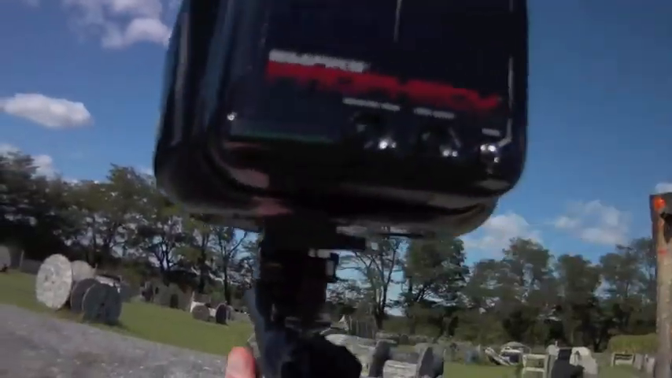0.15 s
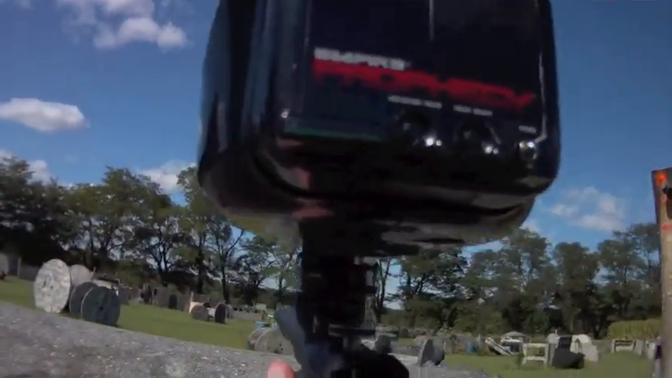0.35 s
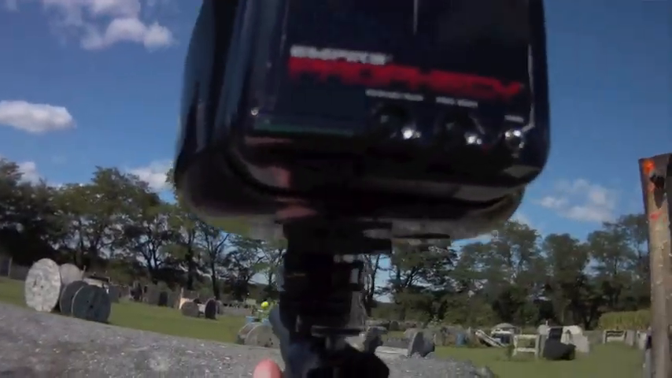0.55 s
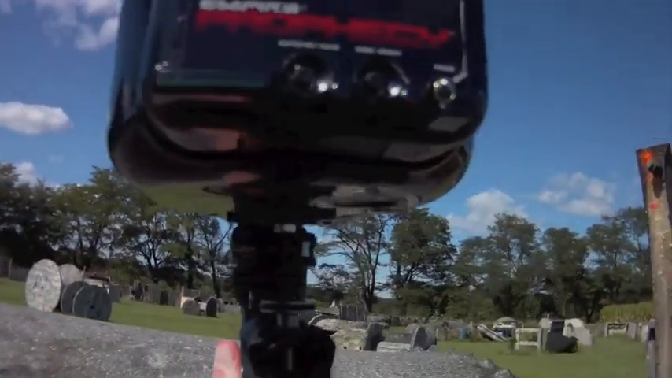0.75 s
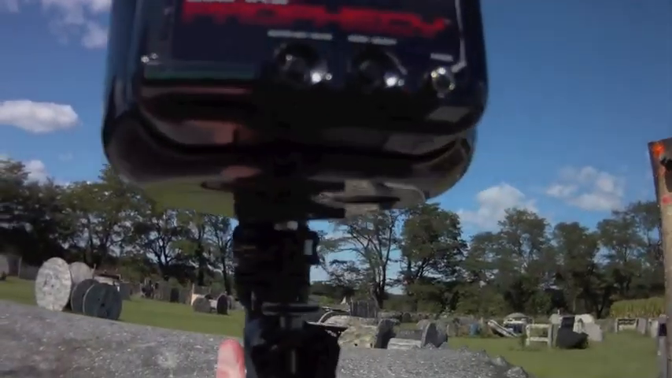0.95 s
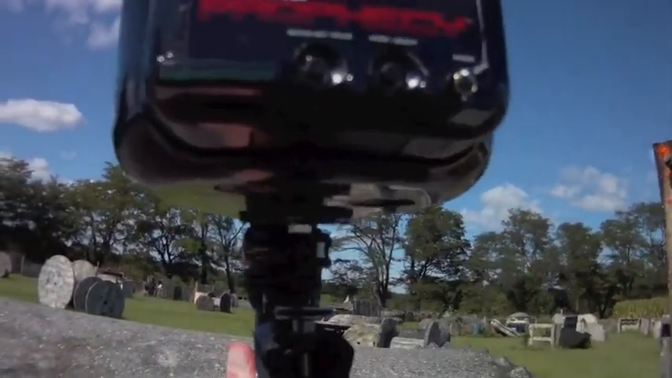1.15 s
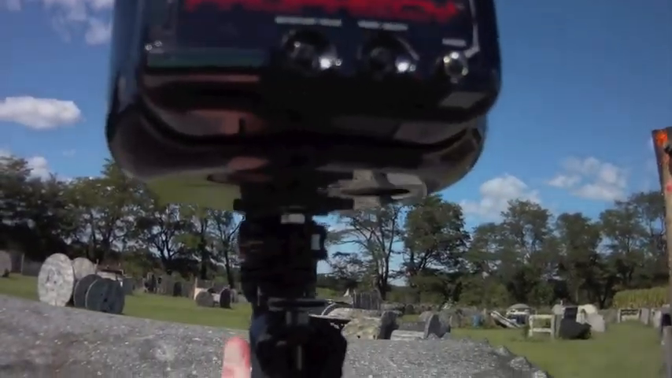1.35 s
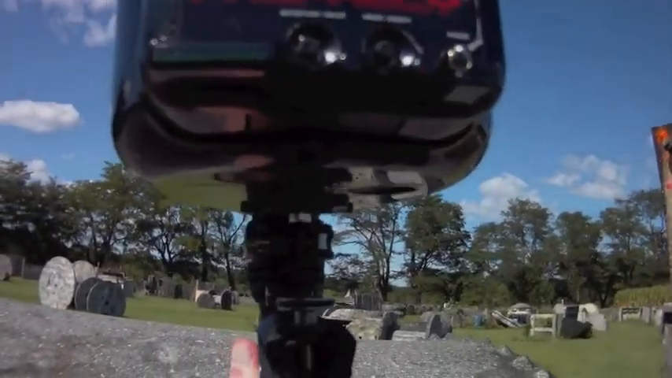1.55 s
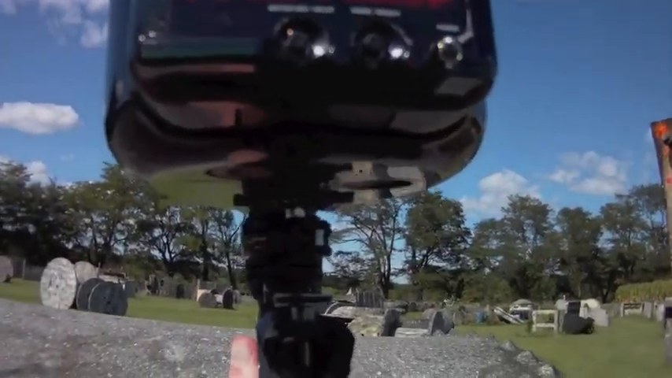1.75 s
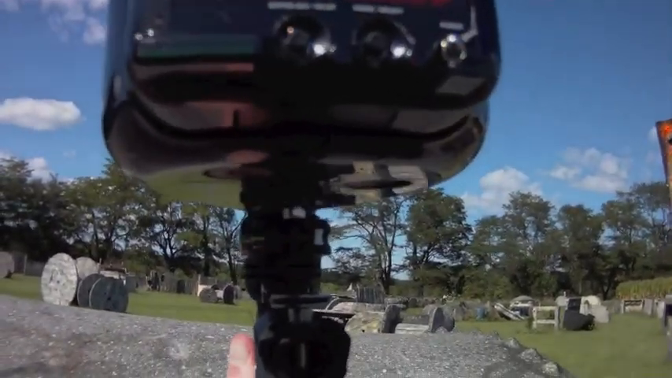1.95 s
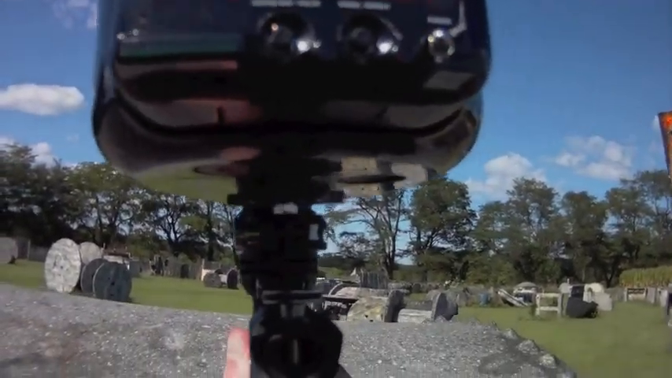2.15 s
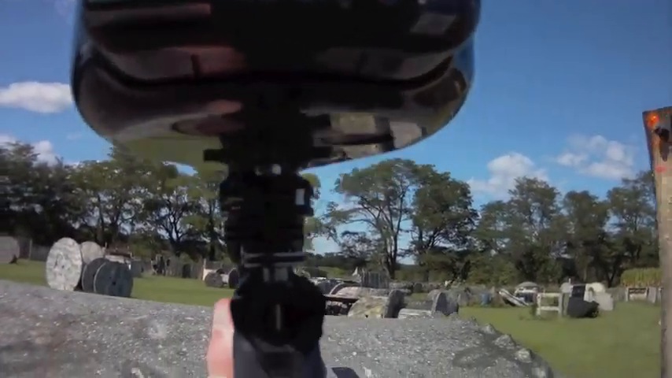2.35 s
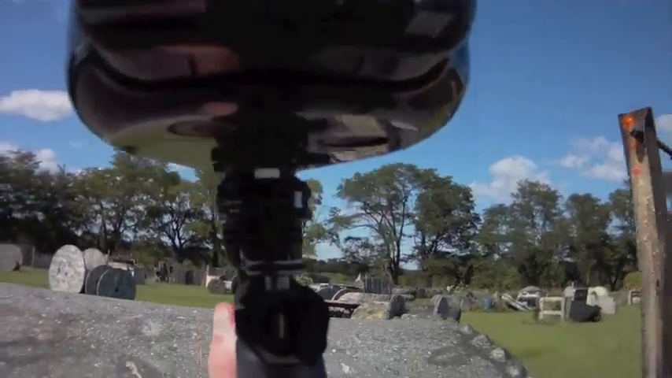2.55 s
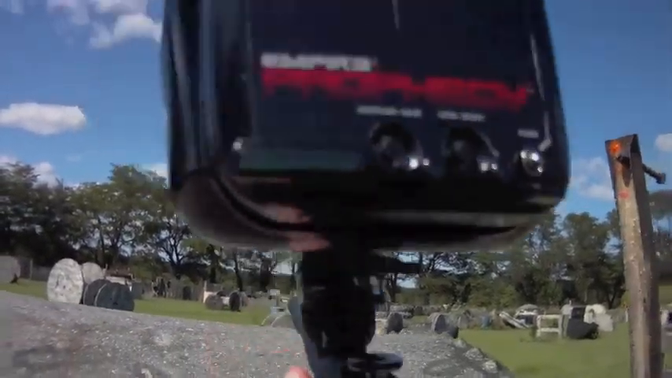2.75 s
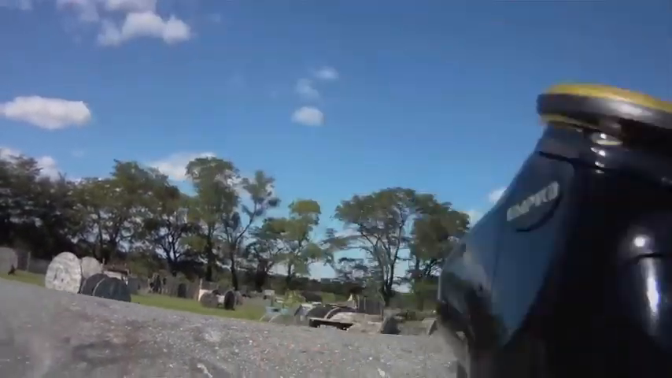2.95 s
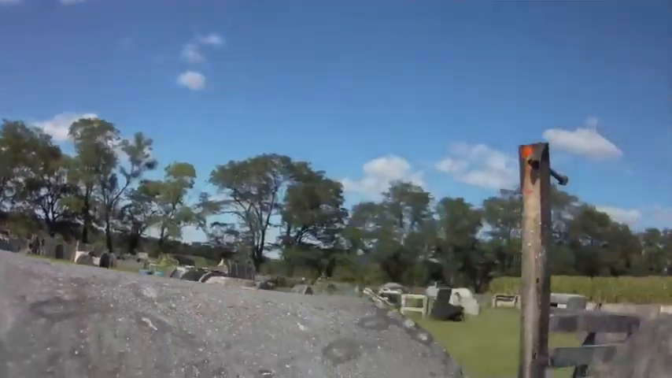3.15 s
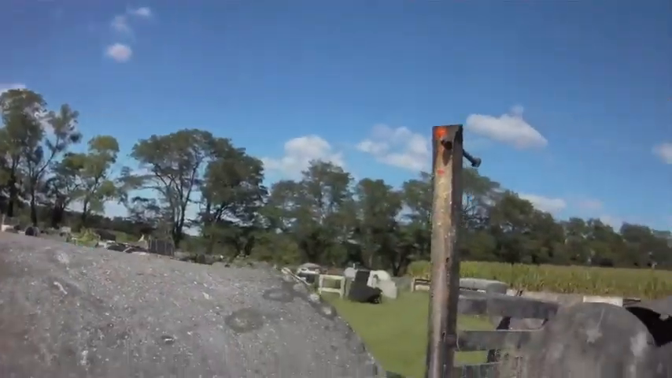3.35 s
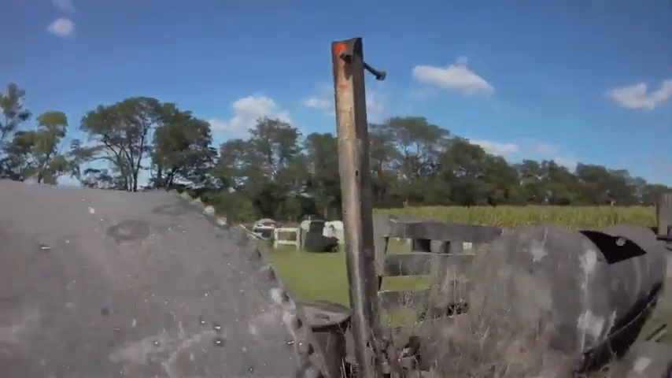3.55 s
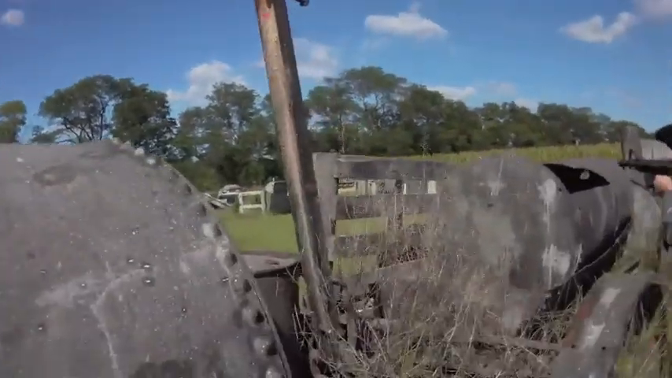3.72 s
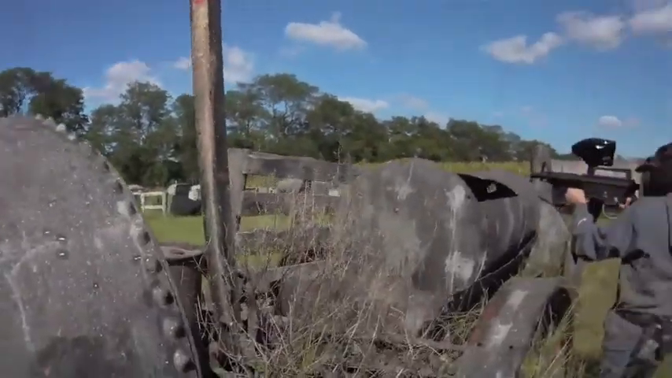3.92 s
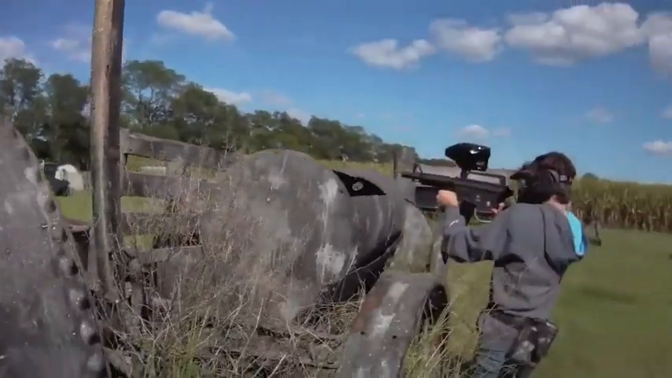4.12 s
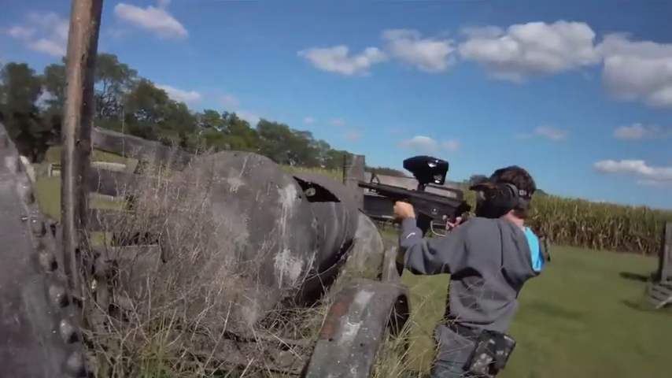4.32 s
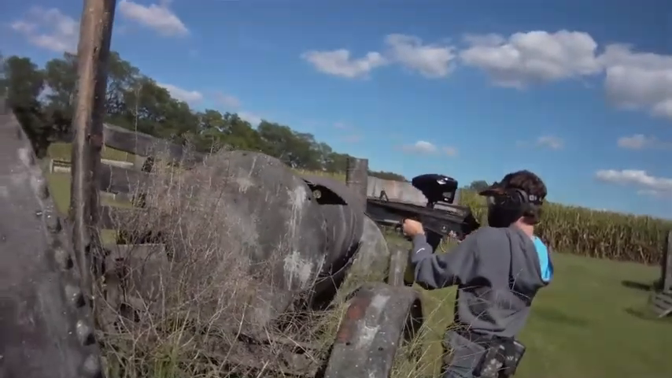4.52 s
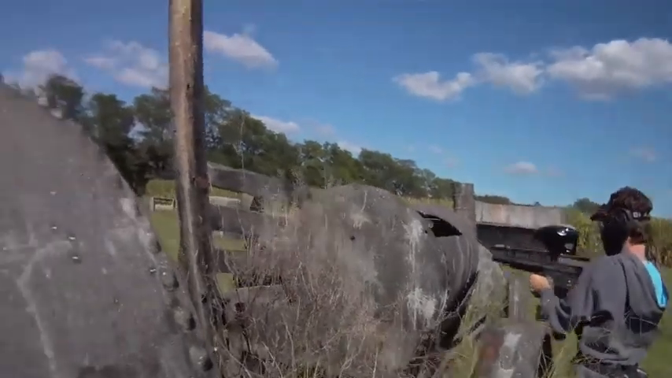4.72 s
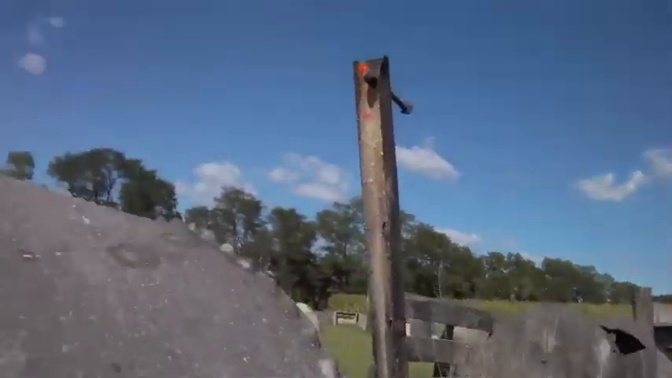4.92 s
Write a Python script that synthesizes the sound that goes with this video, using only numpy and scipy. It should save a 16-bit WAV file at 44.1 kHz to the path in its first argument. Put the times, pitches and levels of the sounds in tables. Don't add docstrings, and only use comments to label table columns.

```python
import sys
import numpy as np
from scipy import signal
from scipy.fft import rfft, irfft
from scipy.io import wavfile
from scipy.ndimage import uniform_filter1d, map_coordinates

SR = 44100
rng = np.random.default_rng(int(sys.argv[2]) if len(sys.argv) > 2 else 0)


def linear_from_db(decibels):
    return 10 ** (np.asarray(decibels, float) / 20)


def persist_wave(psi):
    counts = np.round(np.clip(psi, -1, 1) * 32767).astype(np.int16)
    wavfile.write(sys.argv[1], SR, np.atleast_2d(counts).T)


N = 223807


def unit(x):
    return x / np.sqrt(np.mean(x ** 2) + 1e-20)


def along(points, hz):
    f, v = np.transpose(points)
    return np.interp(np.log(hz + 1), np.log(f + 1), v)


def peaks(rows, hz):
    return sum(gain / (1 + (2 * (hz - centre) / width) ** 2) for centre, width, gain in rows)


def curves(rows):
    s, *cols = np.transpose(rows)
    return [np.interp(np.arange(N) / SR, s, c) for c in cols]


def wobble(rate):
    knots = rng.standard_normal(int(N * rate / SR) + 4)
    return map_coordinates(knots, [np.arange(N) * rate / SR])


# hz, level_db (per Hz)
CASE_TRANSMISSION = [(18, -55), (30, -33.5), (138, -1), (221, -12.5), (394, 3), (666, 2), (1010, -13.5),
                     (1540, -11), (2230, -11), (2980, -10.5), (3870, -2.5), (5040, -22), (8300, -15),
                     (14400, -28.5), (16000, -39)]
# centre_hz, width_hz, gain_db
CASE_CAVITY = [(421.6, 50, 4), (586, 140, 3), (2227, 1000, 6.5), (2600, 650, 4.5), (3520, 150, 0),
               (4030, 50, 0.5), (4450, 1100, 5)]


def response(colour, size=4096):
    hz = np.fft.rfftfreq(size, 1 / SR)
    db = along(CASE_TRANSMISSION, hz) + along(colour, hz) + peaks(CASE_CAVITY, hz)
    cepstrum = irfft(np.log(np.maximum(linear_from_db(db), 1e-7)))
    cepstrum[1:size // 2] *= 2
    cepstrum[size // 2 + 1:] = 0
    h = irfft(np.exp(rfft(cepstrum)))[:size // 2]
    return h / np.linalg.norm(h)


def heard(x, colour):
    return signal.fftconvolve(x, response(colour))[:N]


def place(times, waves):
    first = np.round(np.asarray(times) * SR).astype(int)
    at = first[:, None] + np.arange(waves.shape[1])
    return np.bincount(at.ravel(), waves.ravel(), N + SR)[:N]


def burst_shape(t, rise, hold, t60):
    return (1 - np.exp(-t / rise)) * linear_from_db(-60 * np.maximum(t - hold, 0) / t60)


def puffs(times, dbs, rise, hold, t60, same=0.):
    t = np.arange(SR // 8) / SR
    share = np.clip(same, 0, 1)
    noise = rng.standard_normal((len(times) + 1, len(t)))
    noise = np.sqrt(share) * noise[0] + np.sqrt(1 - share) * noise[1:]
    return place(times, linear_from_db(dbs)[:, None] * burst_shape(t, rise, hold, t60) * noise)


def rings(times, dbs, hz, rise, hold, t60):
    t = np.arange(SR // 8) / SR
    sines = np.sin(2 * np.pi * np.reshape(hz, (-1, 1)) * t)
    return place(times, linear_from_db(dbs)[:, None] * burst_shape(t, rise, hold, t60) * sines)


def pushes(times, dbs, colour):
    h = response(colour)
    spikes = np.bincount(np.round(np.asarray(times) * SR).astype(int), linear_from_db(dbs), N)
    return signal.fftconvolve(spikes, h / np.abs(h).max())[:N]


def echoes(x, decays, delay, lumpy_db):
    out, step = np.zeros(N + 2 * SR), SR // 5
    for start in range(0, N, step):
        hz, t, z = signal.stft(rng.standard_normal(SR * 3 // 4), SR, nperseg=256)
        lumps = lumpy_db * unit(uniform_filter1d(rng.standard_normal(len(t)), size=2))
        gain = linear_from_db(lumps - 60 * t / along(decays, hz)[:, None])
        tail = signal.istft(z * gain, SR, nperseg=256)[1]
        wet = signal.fftconvolve(x[start:start + step], tail / np.linalg.norm(tail))
        out[start + round(delay * SR):][:len(wet)] += wet
    return out[:N]


def lumpy(colour, depth_db, rate):
    return unit(linear_from_db(depth_db * wobble(rate)) * heard(rng.standard_normal(N), colour))


# start_s, blast_db, whistle_hz, low_whistle_db
SHOTS = [(0.165, -3.5, 3630, -9.5), (0.3617, -4, 3520, -8.5), (0.5503, -4.5, 3520, -7.5),
         (0.7278, -4.5, 4060, -12.5), (0.9087, -3.5, 3910, -18.5), (1.0883, -4.5, 4020, -12.5),
         (1.268, -5.5, 3520, -2.5), (1.442, -4.5, 3420, -11), (1.6229, -4, 3600, -12.5),
         (1.8176, -5.5, 3540, -7.5), (2.0046, -3, 3536, -5.5), (2.198, -4.5, 3490, -11.5),
         (2.3913, -3.5, 4010, -5)]
# hz, level_db
BLAST_COLOUR = [(100, -32.5), (700, -25), (1050, -18.5), (1350, -3), (1650, -0.5), (5000, 0), (15000, 1.5)]
# delay_s, pitch_hz, level_db, rise_s, t60_s
CASE_MODES = [
    (0.00017, 520, 5.5, 0.0014, 0.023),
    (0.0006, 740, -9.5, 0.0017, 0.022),
    (0.00709, 395.7, 2.5, 0.0032, 0.026),
    (0.00055, 147, -4.5, 0.0021, 0.043),
]


def marker():
    s, db, high_hz, low_db = np.transpose(SHOTS)
    s = s + .0005
    blow = puffs(s, db - 2, .00015, .0012, .025)
    roar = puffs(s, db - 8.5, 0.0009, 0.0021, .018, same=0.64)
    blast = heard(blow + roar, BLAST_COLOUR)
    grip = rng.standard_normal((len(s), 3))
    low_hz = 2264 * (1 + 0.023 * grip[:, 2])
    whistle = rings(s, db - 7, high_hz, 0.000086, 0.002855, 0.016)
    whistle += rings(s, db + low_db, low_hz, 0.0001, 0.0051, 0.0039)
    body, body_db = 0, -10
    for lag, hz, gain_db, rise, t60 in CASE_MODES:
        mode_db = body_db + gain_db + 2.3 * grip[:, 0]
        body += rings(s + lag, mode_db, hz * (1 + 0.017 * grip[:, 1]), rise, 0, t60)
    return blast + whistle + body


BOLT_RETURNS = [.192, .3918, .5811, .7576, .9394, 1.1188, 1.2994, 1.4726, 1.6537, 1.8473, 2.0346, 2.2277,
                2.4218]
# hz, level_db
SLIDE_COLOUR = [(100, -32), (700, -9), (2500, -1), (4500, -2.5), (8000, -6.5), (15000, -15)]
THUMP_COLOUR = [(60, -15.5), (150, -0.5), (500, -4.5), (900, -18), (1600, -29.5), (4000, -61)]
METAL_COLOUR = [(100, -21), (600, -9.5), (2500, 3), (4000, -1), (10000, 4.5), (15000, 10)]


def action():
    shot = np.transpose(SHOTS)[0]
    play = rng.standard_normal((len(shot), 2))
    valve_lead_s, valve_db, return_db = .0194, -33.5, -11
    s, db = shot - valve_lead_s, valve_db + 1.2 * play[:, 0]
    valve = heard(puffs(s, db + 1.5, .0003, .0028, .012, same=.3), BLAST_COLOUR)
    forward = heard(puffs(s + 0.0066, db - 2.5, .0012, 0.009, 0.01), SLIDE_COLOUR)
    forward += pushes(s + 0.0055, db + 3.0, THUMP_COLOUR)
    seat = heard(puffs(s + .0088, db - 1.0, .0008, .0025, .014), METAL_COLOUR)

    s, db = np.array(BOLT_RETURNS), return_db + .6 * play[:, 1]
    tick = heard(puffs(s - .0062, db - 25.5, .0003, .0008, .01), SLIDE_COLOUR)
    slam = pushes(s + 0.001, db + 4.5, METAL_COLOUR)
    slam += heard(puffs(s, db - 10.5, 0.00062, 0.0004, .025), METAL_COLOUR)
    slam += rings(s + .0007, db, 2680, 0.00031, 0.00055, 0.0058)
    slam += rings(s + 0.00073, db - 14.0, 480, 0.0034, 0.0045, 0.03)
    bounce = heard(puffs(s + .0066, db - 23.5, .0006, 0.0018, 0.019), METAL_COLOUR)
    return valve + forward + seat + tick + slam + bounce


# start_s, direct_crack_db, scattered_blast_db, thump_db
NEIGHBOUR_SHOTS = [(1.035, -28, -20.5, -13.5), (1.2314, -24, -17, -12.5), (1.4314, -12, -17.5, -14),
                   (1.625, -28, -16, -14.5), (1.816, -15, -14.5, -17.5), (2.005, -26, -22, -14),
                   (2.2113, 2, -17.5, -14), (2.3816, -8.5, -19.5, -13), (2.568, -21, -20, -17),
                   (2.7881, -37, -20, -16), (3.001, -34, -20.5, -17.5), (3.206, -24, -19.5, -17.5),
                   (3.427, -13, -14.5, -17.5), (3.6148, -9, -18.5, -18.5), (3.814, 2, -16, -17.5),
                   (4.0068, 5, -20.5, -18), (4.213, 4, -17, -19.5)]
# hz, level_db
CRACK_COLOUR = [(100, -26), (700, -3.5), (1100, -1.5), (2000, 1.5), (4300, 3.5), (5500, 9), (6800, 6.5),
                (8300, -0.5), (11000, 6.5), (15000, 2)]
# hz, t60_s
YARD_DECAY = [(150, 0.5), (500, 0.14), (3000, 0.12), (10000, 0.13)]
# delay_s, low_db, bright_db
BUNKERS = [
    (.098, -37.5, -40),
    (0.141, -45.5, -47),
]


def neighbour():
    s, crack_db, scatter_db, thump_db = np.transpose(NEIGHBOUR_SHOTS)
    play = rng.standard_normal((len(s), 2))
    thump_hz = np.interp(s, (3.35, 3.81), (629, 483)) * (1 + .025 * play[:, 0])
    bolt_db = -25 + 1.2 * play[:, 1]
    hiss = puffs(s - .0228, bolt_db - 27, .001, 0.021, .025)
    valve = puffs(s - .0228, bolt_db - 18, .0004, 0.0013, 0.013)
    lead = puffs(s - .0022, scatter_db - 6, .001, .002, .01)
    scatter = puffs(s, scatter_db + 3.5, 0.001, 0.0019, 0.012)
    scatter += puffs(s + 0.0033, scatter_db, 0.00079, 0.00092, 0.016)
    bolt = puffs(s + .014, bolt_db + 2, .0008, .002, .022)
    bright = heard(hiss + valve + lead + scatter + bolt, CRACK_COLOUR) - pushes(s, crack_db, CRACK_COLOUR)
    thump = rings(s, thump_db, thump_hz, .0007, .0052, .02)
    thump += rings(s, thump_db - 22, 105, 0.0043, 0.0064, 0.066)
    thump += rings(s + 0.00064, thump_db - 5.5, 362, 0.0011, 0.0029, 0.043)
    yard = echoes(linear_from_db(-12.5) * bright + linear_from_db(-11.5) * thump, YARD_DECAY, .003, lumpy_db=3.5)
    back = 0
    for lag, low_db, high_db in BUNKERS:
        back += np.roll(linear_from_db(low_db) * thump + linear_from_db(high_db + 11.0) * yard, round(lag * SR))
    return bright + thump + yard + back


# hz, t60_s
TREE_DECAY = [(150, .3), (500, 0.44), (3000, 0.21), (7000, 0.052), (14000, 0.051)]
WOOD_DECAY = [(300, .5), (3000, 0.83), (6000, .4), (12000, .2)]


def tree_line(shots):
    edge = linear_from_db(-31.0) * echoes(shots, TREE_DECAY, 0.022, lumpy_db=7.5)
    return edge + linear_from_db(-38.5) * echoes(shots, WOOD_DECAY, .06, lumpy_db=2.5)


# start_s, peak_db, low_knock_db (over the peak)
KNOCKS = [(0.2388, -48.5, 12), (0.2618, -34, -28), (.2705, -37, -21), (0.4575, -30.5, -9.5),
          (.63, -38, -14), (0.805, -28, -14), (0.9744, -21.5, -9), (1.4022, -34, -5.5), (1.5161, -32.5, 0),
          (1.6909, -29, -10), (1.731, -31, -17), (1.921, -29.5, -6), (2.0764, -31, -14.5),
          (2.1152, -31, -5), (2.158, -38, -19), (2.3262, -31, -12.5), (2.4682, -36.5, 0),
          (2.5117, -24, -12.5), (2.7375, -27.5, -5.5), (2.7478, -29.5, -14), (3.5289, -38.5, -0.5),
          (3.7511, -37.5, 2.5), (4.9718, -41, -25.5), (4.9752, -39.5, -24), (5.04, -52, -6)]
# hz, level_db
TUMBLE_COLOUR = [(60, -16), (200, -5), (330, 0), (460, -0.5), (600, -5), (720, -6), (1000, -0.5),
                 (1400, -2), (2200, -29.5), (4000, -61.5)]


def knocks():
    s, db, low_db = np.transpose(KNOCKS)
    tick = heard(puffs(s, db - 11.0, 0.00056, .0015, .03), SLIDE_COLOUR)
    return tick + heard(puffs(s, db + low_db - 1.5, 0.00059, .003, .045), TUMBLE_COLOUR)


# start_s, level_db
HANDLING = [(0, -40), (.8, -93), (1.1, -53), (2.4, -61), (2.75, -56), (3.3, -54), (3.6, -42.5),
            (3.85, -46.5), (4.05, -77), (4.5, -84), (4.95, -84.5), (5.0, -66), (5.07, -66)]
# hz, level_db
CLATTER_COLOUR = [(100, -37.5), (800, -18.5), (1300, -5.5), (2500, 3), (4500, -3.5), (6500, -1.5),
                  (9000, -14.5), (15000, -20.5)]
WHINE_COLOUR = [(300, -49), (900, -13), (1150, 4), (1330, 14.5), (1500, -7), (1900, -34), (5000, -60)]
CLOTH_COLOUR = [(300, -32), (1000, -13), (1500, 1), (2200, -3.5), (2900, 17), (3500, -25), (6000, -5.5),
                (12000, -29)]
# start_s, rise_s, hold_s, fall_s
BRUSH = (3.46, .08, .27, .07)


def rattle():
    t = np.arange(N) / SR
    shots = np.r_[-.03, np.transpose(SHOTS)[0]]
    since = t - shots[np.searchsorted(shots, t) - 1]
    jolt = linear_from_db(-43.5 - 62 * since)
    tumbling = lumpy(TUMBLE_COLOUR, 3, 70)
    clatter = linear_from_db(-9.5) * lumpy(CLATTER_COLOUR, 1.7, 110)
    balls = np.hypot(jolt, linear_from_db(curves(HANDLING)[0])) * (tumbling + clatter)
    paddle = linear_from_db(-54.5 - 35 * since) * lumpy(WHINE_COLOUR, 3.3, 60)
    start, rise, hold, fall = BRUSH
    end = start + rise + hold + fall
    stroke = np.clip(np.minimum((t - start) / rise, (end - t) / fall), 0, 1)
    cloth = linear_from_db(-53.5) * stroke ** 2 * lumpy(CLOTH_COLOUR, 2.5, 130)
    return balls + paddle + cloth


# order, level_db, gust_share
ENGINE_ORDERS = [(1, -75.5, 0.1), (2, -85, 0.1), (3, -68, 0.43), (4, -76, .3), (5, -78.5, 0.1),
                 (6, -69, 1.4), (7, -86.5, 0.1)]
# start_s, level_db
GUSTS = [
    (4.43, -16.5),
    (4.55, 1.5),
    (4.72, -3.5),
    (4.86, -12),
    (5.0, 0),
    (5.07, -3),
]


def engine():
    base_hz = 107.4
    phase = 2 * np.pi * base_hz * np.cumsum(1 + 0.0015 * wobble(6)) / SR
    gust_db, = curves(GUSTS)
    hum = 0
    for order, db, share in ENGINE_ORDERS:
        level = linear_from_db(db + share * gust_db + 1.5 * wobble(4.9))
        hum += np.sqrt(2) * level * np.sin(order * phase + rng.uniform(0, 2 * np.pi))
    return hum


# hz, level_db (per Hz)
AIR_COLOUR = [(15, -18), (25, -3), (110, -1), (650, -7), (1100, -14.5), (4000, -16), (5600, -20),
              (9500, -24.5), (15200, -19), (16000, -37)]
# centre_hz, width_hz, gain_db
CIRCUIT_BANDS = [(6300, 250, 4.5), (8400, 300, 7), (11400, 350, 8), (12950, 300, 6.5), (13600, 700, 3)]


def air():
    hz = np.fft.rfftfreq(N, 1 / SR)
    db = along(AIR_COLOUR, hz) + peaks(CIRCUIT_BANDS, hz)
    floor = irfft(rfft(rng.standard_normal(N)) * linear_from_db(db), N)
    return linear_from_db(-67 + 0.62 * wobble(7.5)) * unit(floor)


def scene():
    shots = marker() + neighbour()
    near = shots + tree_line(shots) + action() + knocks() + rattle()
    loud = uniform_filter1d(np.abs(near), size=SR // 20)
    duck_db, knee_db = -5.5, -55
    floor_gain = linear_from_db(duck_db * loud / (loud + linear_from_db(knee_db)))
    return (near + engine() + floor_gain * air())[None]


def band_limit(x):
    return signal.sosfilt(signal.butter(12, 16520, fs=SR, output="sos"), x)


def record(dry):
    hz = np.fft.rfftfreq(N, 1 / SR)
    bass_hz, top_hz, ceiling = 73.9, 15520, .89
    thin = irfft(rfft(dry) * (1j * hz / (bass_hz + 1j * hz)) ** 2, N)
    rounded = thin / (1 + np.abs(thin / ceiling) ** 5) ** (1 / 5)
    limited = irfft(rfft(rounded) / (1 + (hz / top_hz) ** 60), N)
    return band_limit(limited)


dry = scene()
out = record(dry)
persist_wave(out)
```